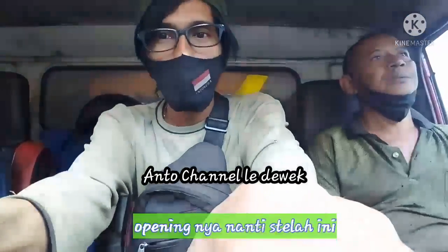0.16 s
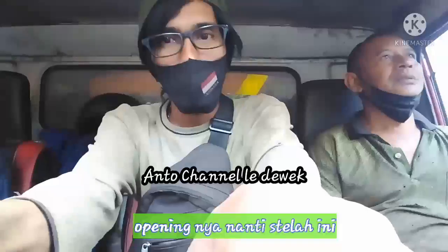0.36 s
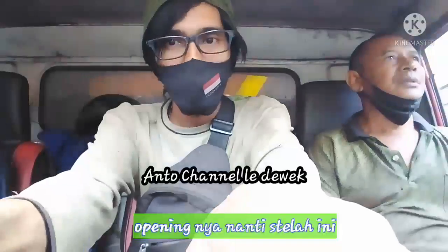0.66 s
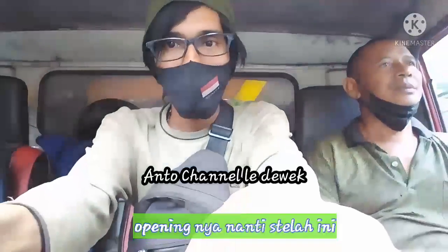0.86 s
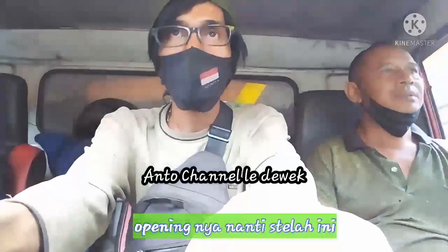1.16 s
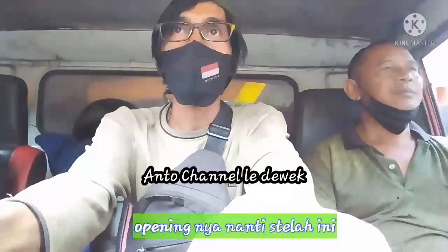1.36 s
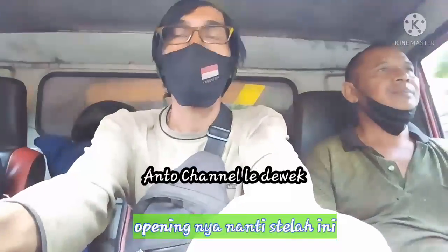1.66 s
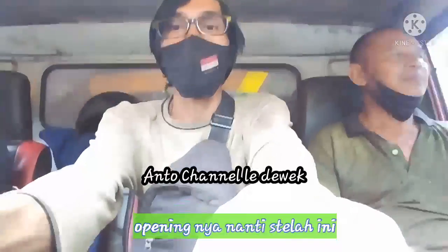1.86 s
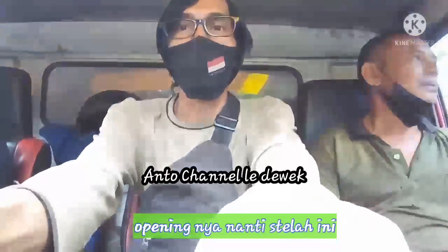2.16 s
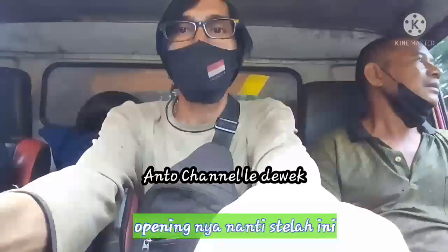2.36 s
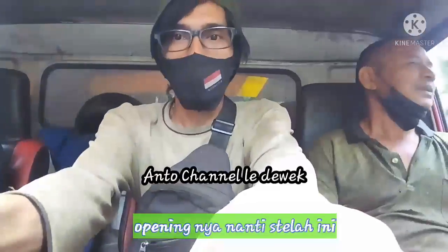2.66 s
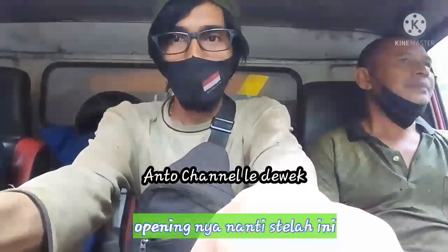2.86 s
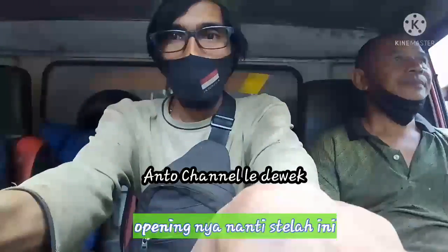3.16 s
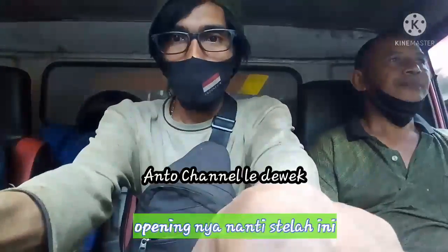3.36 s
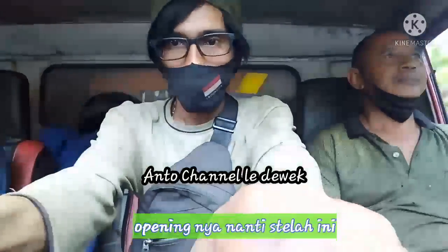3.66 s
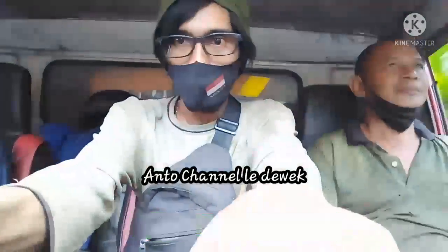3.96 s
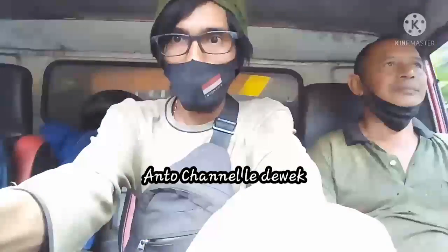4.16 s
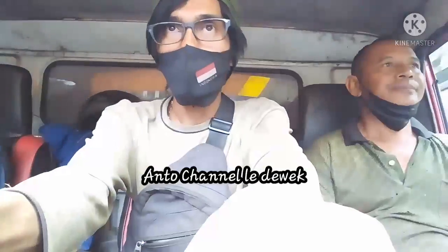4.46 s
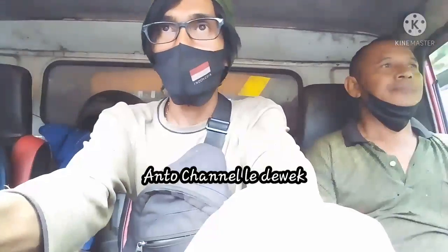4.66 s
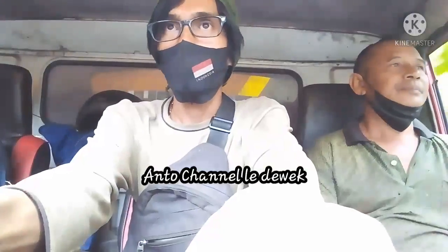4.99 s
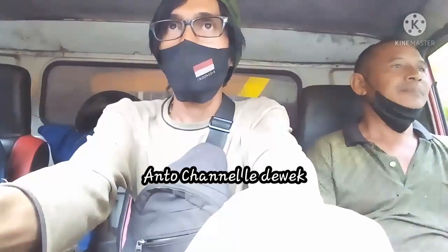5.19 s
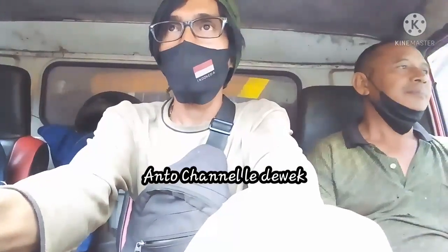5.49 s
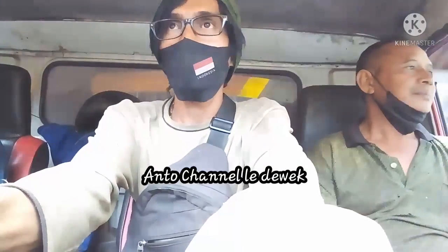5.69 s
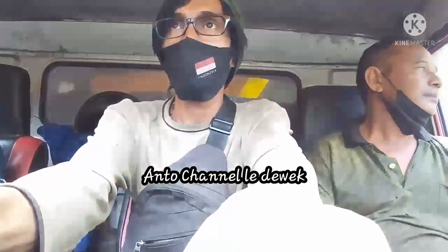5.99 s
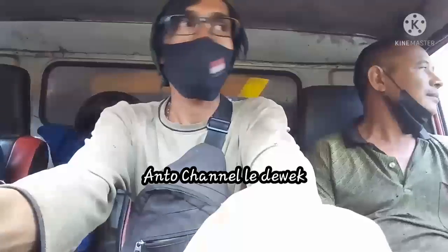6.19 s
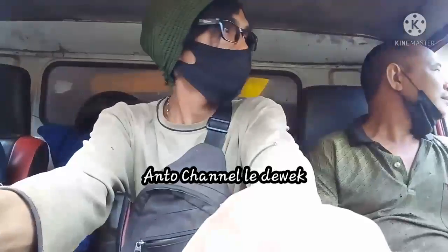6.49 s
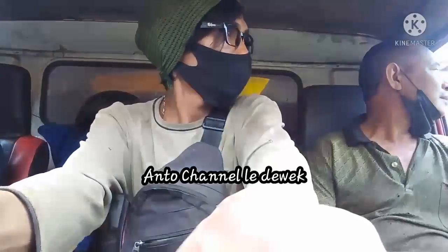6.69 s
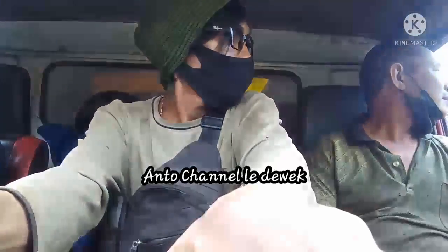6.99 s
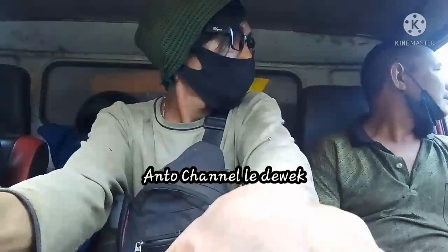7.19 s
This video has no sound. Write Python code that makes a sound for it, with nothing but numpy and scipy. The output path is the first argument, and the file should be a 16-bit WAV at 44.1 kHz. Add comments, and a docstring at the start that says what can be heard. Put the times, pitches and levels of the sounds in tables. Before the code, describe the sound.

A small four-cylinder diesel truck is heard inside its cramped cab through a hand-held phone. From 0 to 1 s a deep, pulsing boom near 50 Hz eases off, with soft cab rumble and thin hiss. Around 1.0-1.2 s a cluster of hard, near-overloading knocks and a dull rub cuts in; more knocks follow at 1.65-1.85, 2.0-2.3, 2.57 and 3.0-3.15 s, with brief grainy scuffs, and again at 3.6 and 4.0 s. Road jolts rumble softly, and clatter swells lightly near 2.5 s. The engine is quietest around 4.2-4.7 s while its pitch creeps up. At 5.0 s a very hard knock meets a loud grainy swish lasting about 0.2 s. From 5.3 s the engine pulls much louder, with growl, resonant panel drone and diesel clatter. A bright clatter swell with a tiny falling squeak comes near 6.2 s; the heavy drone then sags slightly in pitch until 7.3 s.

```python
"""An engine booms and eases off, then pulls again with a louder, clattering drone; knocks and rubs cut in.
It is a small four-cylinder diesel truck heard from inside its cab, on a hand-held phone.
Engine: tones locked to the firing rate, plus noise pulsed by each firing and coloured by block and cab.
Handling: pressure spikes with a case ring for knocks; swells of grainy noise for rubs and two clatter swells.
One loud swish, cab rumble and a thin hiss complete it."""
import sys
import numpy as np
from scipy import signal
from scipy.fft import rfft, irfft, next_fast_len
from scipy.io import wavfile
from scipy.ndimage import uniform_filter1d, minimum_filter1d

SR = 44100
rng = np.random.default_rng(int(sys.argv[2]) if len(sys.argv) > 2 else 0)


def materialize(psi):
    """Save the field psi as 16-bit PCM at rate SR to the path in sys.argv[1].

    A 1-D psi becomes a single channel; in a 2-D psi each row is a channel.
    """
    bounded = np.clip(np.atleast_2d(psi).T, -1, 1)
    quanta = np.round(bounded * 32767).astype(np.int16)
    wavfile.write(sys.argv[1], SR, quanta)


N = 323546
TIME_S = np.arange(N) / SR

# Engine speed. Each row: time in seconds, firings per second.
FIRING_RATE_HZ = [(0, 52.7), (.75, 51), (1.05, 49.7), (1.55, 49.4), (1.85, 50.9), (2.4, 48.1), (3.15, 50.3),
                  (3.6, 50), (4, 52.4), (4.8, 54.3), (5.35, 55.5), (5.85, 55.55), (6.1, 56.05),
                  (6.45, 55.7), (6.7, 55.8), (7.05, 53.3), (7.34, 52.6)]
# Cab boom at the firing rate. Each row: time in seconds, level in dB.
BOOM_DB = [(0.0, -15), (0.14, -13.5), (0.89, -21), (1.08, -16.5), (1.3, -26), (1.85, -24.5), (1.91, -36),
           (1.95, -23), (2.11, -23), (2.25, -29.5), (2.4, -18), (3.07, -27.5), (3.15, -28), (3.23, -22),
           (4.57, -37), (4.86, -24), (4.94, -26), (5.02, -13), (5.49, -23), (5.96, -16), (6.04, -19),
           (6.59, -11), (6.77, -14.5), (7.3, -14.5)]
# Engine easing off. Each row: time in seconds, low growl, panel drone and diesel clatter in dB.
EASING_DB = [(0.0, -24, -40, -56), (0.45, -27.5, -43.5, -56.5), (1.04, -26, -46, -57.5),
             (1.33, -32.5, -49.5, -59), (1.71, -35, -51, -61), (1.89, -31.5, -45, -58),
             (2.38, -29.5, -46.5, -52.5), (3.01, -34, -47.5, -55.5), (3.19, -28.5, -44, -55),
             (3.37, -30, -45, -54.5), (3.74, -39.5, -51.5, -59), (4.27, -41.5, -57.5, -62.5),
             (4.72, -40.5, -50.5, -57), (4.96, -25.5, -40, -43)]
# Engine pulling. Each row: time in seconds, low growl, panel drone and diesel clatter in dB.
PULLING_DB = [(5.3, -24.5, -29, -37.5), (5.42, -24, -36.5, -41), (5.46, -22.5, -28.5, -37),
              (6.05, -24.5, -31.5, -42.5), (6.1, -20, -28, -36.5), (6.78, -17, -25, -40.5),
              (7.14, -18.5, -28.5, -44.5), (7.32, -15.5, -26.5, -43)]
# Exhaust and block tones. Each row: multiple of the firing rate, dB coasting, dB pulling, re the growl.
GROWL_ORDERS = [(1.5, -8.5, -19.5), (2, -3.5, -1.5), (2.5, -13.5, -14.5), (3, -11, -7.5), (3.5, -17, -9.5),
                (4, -6.5, -11), (4.5, -30, -27), (5, -22.5, -10), (5.5, -30.5, -17)]
# Spectrum of the growl's noise. Each row: frequency in Hz, relative density in dB per Hz.
GROWL_SPECTRUM = [(22, -13.5), (45, -3.5), (75, -5), (130, 0.5), (190, -2.5), (260, -8.5), (340, -13),
                  (450, -23), (700, -55.5)]
# Spectrum of the clatter, coasting. Each row: frequency in Hz, relative density in dB per Hz.
COASTING_SPECTRUM = [(700, -16), (1100, 2), (1450, 2), (1700, -0.5), (2000, 1.5), (2750, -1.5),
                     (3050, -13.5), (4000, -16), (4400, -26), (5400, -20.5), (6500, -37), (15000, -51.5)]
# Spectrum of the clatter, pulling. Each row: frequency in Hz, relative density in dB per Hz.
PULLING_SPECTRUM = [(800, -3), (1300, 8.5), (1600, 5.5), (2100, -1.5), (2700, -4), (3300, -14), (4000, -19),
                    (5000, -29.5), (6500, -42.5), (10000, -37.5), (15000, -57)]
# Cab panel resonances. Each row: centre in Hz, width in Hz, relative strength in dB.
PANEL_MODES = [(405, 48, -7.5), (495.3, 20, 0), (543, 34, 0), (615, 36, -4.5), (773, 36, -4),
               (890, 41, -16.5), (970, 48, -12.5), (1130, 64, -14), (1326, 140, -16.5)]
# Knocks on the phone's case. Each row: time in seconds, signed peak pressure (+ pressing, - letting go),
# contact in ms.
KNOCKS = [ (0.9989, 0.22, 0.68), (1.1443, 1.4, 0.63), (1.1672, 0.36, 0.68), (1.1829, 0.5, 2.1),
          (1.196, -0.53, 4.1), (1.648, 0.2, 1.45), (1.6685, -0.33, 2.7), (1.6889, 0.63, 1.7),
          (1.7099, 0.51, 1.52), (1.7302, -.18, 1.6), (1.7778, 0.31, 1.08), (1.833, -0.56, 0.89),
          (2.0162, 0.15, 1.1), (2.0655, 0.82, .96), (2.1078, 0.55, 2.3), (2.1268, 0.26, 1.1),
          (2.2144, -0.64, .78), (2.3278, -0.41, 1.6), (2.4977, -.13, 1.5), (2.5691, -1.2, 1),
          (2.778, 0.13, 0.85), (2.9866, -0.96, 0.74), (3.0074, -0.71, 3.1), (3.0357, -0.57, 1.3),
          (3.103, -0.97, 0.77), (3.1488, 0.29, 1.5), (3.5974, 1.08, .6), (3.6647, 0.22, 1.3),
          (3.7363, -0.056, .67), (3.9492, -0.1, 0.56), (3.9681, -0.19, 1.7), (4.0053, -0.36, 0.88),
          (4.2135, -.1, 0.64), (4.4976, -.03, 0.48), (4.9865, -1.6, 1.08)]
# Fingers rubbing the case, and two longer, bright swells of engine clatter (2.476, 6.189).
# Each row: peak time in seconds, half length in seconds, scuff in dB, rasp in dB above the scuff.
RUBS_AND_CLATTER_SWELLS = [ (1.008, .005, -46, -3), (1.041, 0.045, -32.5, -13), (1.169, 0.0087, -13, -12.5),
                           (1.223, 0.0095, -20.5, -15.5), (1.245, 0.0086, -27.5, -11),
                           (1.957, 0.018, -33, -5.5), (2.023, .004, -24.5, -18), (2.105, .012, -30, -30.5),
                           (2.232, 0.0066, -31, -8), (2.331, .012, -27.5, -25), (2.476, .16, -56, 3),
                           (3.147, 0.023, -25, -29), (3.282, 0.042, -31, -3), (3.693, 0.016, -34.5, -2),
                           (4.034, 0.018, -26.5, -12.5), (4.048, 0.017, -45.5, 7), (6.189, 0.11, -36.5, -1)]
# Spectrum of the dull scuff part. Each row: frequency in Hz, relative density in dB per Hz.
SCUFF_SPECTRUM = [(40, -14), (110, 1), (300, -3), (480, -5.5), (750, -11), (1100, -22), (2000, -38),
                  (4000, -79.5)]
# Spectrum of the rasp part. Each row: frequency in Hz, relative density in dB per Hz.
RASP_SPECTRUM = [(250, -17.5), (550, 6.5), (950, 1.5), (1300, -1.5), (1650, -6.5), (2000, -10.5),
                 (2500, -19.5), (3200, -23.5), (3800, -34), (5000, -44.5), (9000, -72)]
# Spectrum of the hiss part and of skin snaps. Each row: frequency in Hz, relative density in dB per Hz.
HISS_SPECTRUM = [(1500, -11.5), (2700, 10.5), (4000, 8), (5200, 2), (6200, -9.5), (7300, -6.5),
                 (10000, -9.5), (15500, -14.5)]
# Skin snapping free. Each row: time in seconds, level in dB.
SNAPS = [(1.002, -54), (1.1443, -52), (1.99, -55), (2.24, -56), (4.062, -50), (5.18, -28.5)]
# Spectrum of the swish's body. Each row: frequency in Hz, relative density in dB per Hz.
SWISH_SPECTRUM = [(100, 4), (250, 3.5), (400, -5.5), (560, 0), (800, -3.5), (950, -6), (1300, -5),
                  (1800, -12), (2300, -17), (2900, -17.5), (3300, -26), (4000, -29.5), (4500, -44),
                  (6500, -48)]
# Spectrum of the swish's top hiss. Each row: frequency in Hz, relative density in dB per Hz.
SWISH_TOP_SPECTRUM = [(3000, 3), (5000, 13), (6200, -14), (7300, -1), (10000, -0.5), (13000, -10),
                      (15500, -12)]
# Bumps in the road. Each row: peak time in seconds, half length in seconds, level in dB.
JOLTS = [(0.248, 0.39, -28), (1.02, 0.19, -25.5), (1.683, 0.037, -27), (2.2, 0.33, -29.5), (2.61, .06, -20),
         (2.898, 0.097, -25.5), (6.6, 0.35, -41.5)]
# Spectrum of the cab rumble. Each row: frequency in Hz, relative density in dB per Hz.
RUMBLE_SPECTRUM = [(45, -22), (62, -5.5), (74, -4), (86, -9), (105, -15.5), (150, -29)]

# The throttle opens once; load rises from its coasting share to 1.
THROTTLE_S, THROTTLE_RISE_S, COASTING_LOAD = 4.7, 0.88, .13
CASE_HZ, CASE_T60_S = 107, 0.038
# Share of a 1 ms knock that swings the case (a pressing finger damps it); exponent on contact ms.
PRESS_RING, RELEASE_RING, RING_GROWTH = 0.54, 0.92, 0.15
# Hiss part: dB above the scuff when scuff and rasp are equal; dB per dB of rasp.
HISS_DB, HISS_DB_PER_DB = -26.5, 1.7
SNAP_DECAY_S = 0.0025
SQUEAK_S, SQUEAK_HALF_S, SQUEAK_DB, SQUEAK_HZ, SQUEAK_SAG_HZ_PER_S = 6.165, 0.016, -31.5, 1620, 800
SWISH_S, SWISH_ATTACK_S, SWISH_END_S = 4.988, .115, 5.185
SWISH_DB, SWISH_DECAY_S, SWISH_TOP_DB, SWISH_TOP_DECAY_S = -15.5, 0.037, -52, 0.02
ROAD_DB = -42
# Thin hiss: level at a clatter of 0 dB; share of the clatter's dB swing.
AIR_DB, AIR_DB_PER_DB = -68, 0.25
CUTOFF_HZ = 15600


def engine(growl_noise_db=-2.0, growl_coasting_db=-0.5, growl_pulling_db=-1.5):
    """Firings drive the cab's air, its panels and the clatter of the block."""
    (rate_hz,), (boom_db,) = in_time(FIRING_RATE_HZ), in_time(BOOM_DB)
    growl_db, drone_db, clatter_db = in_time(EASING_DB + PULLING_DB)
    load = np.clip(COASTING_LOAD + (1 - COASTING_LOAD) * ramp(THROTTLE_S, THROTTLE_RISE_S), 0, 1)
    growl_db = growl_db + growl_coasting_db + (growl_pulling_db - growl_coasting_db) * load
    turn = np.cumsum(rate_hz) / SR  # firings so far

    boom = np.sqrt(2) * from_db(boom_db + 0.63 * drift(13.0)) * np.cos(2 * np.pi * turn)
    growl = tones(turn, GROWL_ORDERS, load, rough=.2)
    growl_noise = firing_noise(turn, GROWL_SPECTRUM, sharpness=0.12, uneven_db=2.0, repeat=0.04)
    growl += from_db(growl_noise_db) * growl_noise
    coasting = firing_noise(turn, COASTING_SPECTRUM, sharpness=0.048, uneven_db=0.5, repeat=0.42)
    pulling = firing_noise(turn, PULLING_SPECTRUM, sharpness=0.059, uneven_db=0.8, repeat=0.14)
    clatter = (1 - load) * coasting + load * pulling
    drone = panel_drone(turn, rate_hz)
    return boom + from_db(growl_db) * growl + from_db(drone_db) * drone + from_db(clatter_db) * clatter


def tones(turn, orders, load, rough):
    """Multiples of the firing rate, each wavering in strength and phase."""
    out = np.zeros(N)
    for multiple, coasting_db, pulling_db in orders:
        start_turns = rng.random() * (multiple > 2)  # low orders start in phase
        angle = 2 * np.pi * (np.round(2 * multiple) / 2 * turn + start_turns)
        level_db = coasting_db + (pulling_db - coasting_db) * load
        out += np.sqrt(2) * from_db(level_db) * wavering(angle, rough)
    return out


def wavering(angle, rough):
    """Slow random in-phase and quadrature parts make a tone waver."""
    return (1 + rough * drift(3)) * np.cos(angle) + rough * drift(3) * np.sin(angle)


def firing_noise(turn, spectrum, sharpness, uneven_db, repeat):
    """A puff at each firing, of random strength; a share repeats with every four-cylinder cycle."""
    firing = np.floor(turn + .5).astype(int)
    strength = from_db(uneven_db * rng.standard_normal(1000))[firing]
    pattern = rng.standard_normal(2400)
    cycle = rms_one(np.interp(turn % 4 / 4, np.linspace(0, 1, len(pattern)), pattern))
    repeat = np.clip(repeat, 0, 1)
    drive = np.sqrt(repeat) * cycle + np.sqrt(1 - repeat) * rng.standard_normal(N)
    puff = np.exp(sharpness * np.cos(2 * np.pi * turn))
    return coloured(drive * strength * puff, spectrum)


def panel_drone(turn, rate_hz, tone_db=-3, half_order_db=-9, noise_db=-2.0, rough=0.32):
    """Each engine order swells as it crosses a panel resonance; combustion noise rings the same panels."""
    lines = np.zeros(N)
    for halves in range(13, 34):  # orders 6.5 to 16.5 of the firing rate
        angle = np.pi * halves * turn + 2 * np.pi * rng.random()
        gain = np.interp(TIME_S, TIME_S[::256], panel_gain(halves / 2 * rate_hz[::256]))
        lines += from_db(half_order_db * (halves % 2)) * gain * wavering(angle, rough)
    hz = np.geomspace(150, 3000, 400)
    spectrum = np.c_[hz, 20 * np.log10(panel_gain(hz))]
    noise = firing_noise(turn, spectrum, sharpness=0.076, uneven_db=1.0, repeat=0)
    return from_db(tone_db) * rms_one(lines) + from_db(noise_db) * noise


def panel_gain(hz):
    """Panel response: resonances summed in power, dark below and above them."""
    power = 0
    for centre_hz, width_hz, db in PANEL_MODES:
        detuning = (hz / centre_hz - centre_hz / hz) * centre_hz / width_hz
        power = power + from_db(2 * db) / (1 + detuning ** 2)
    return np.sqrt(power / (1 + (hz / 1600) ** 8) / (1 + (300 / hz) ** 6))


def knocks(rebound_ms=1.3, lag_ms=0.68, rebound_share=.22, crack_share=0.064, crack_ms=.25):
    """A contact is a pressure spike with a tiny crack at its tip; the case swings back and dies away."""
    out = np.zeros(N)
    for s, peak, contact_ms in KNOCKS:
        near = slice(int((s - .01) * SR), int((s + .07) * SR))
        t_s = TIME_S[near] - s
        ms = t_s * 1000
        ring_share = (PRESS_RING if peak > 0 else RELEASE_RING) * contact_ms ** RING_GROWTH
        spike = 1 / np.cosh(np.clip(2 * ms / contact_ms, -30, 30)) ** 2
        crack = crack_share * abs(peak) * np.exp(-(ms / crack_ms) ** 2)  # harder knocks crack more
        rebound = np.exp(-((ms - lag_ms - contact_ms / 2) / rebound_ms) ** 2)
        settled = (1 + np.tanh((ms - contact_ms) / (1.2 * contact_ms))) / 2
        decay = from_db(-60 * np.maximum(t_s, 0) / CASE_T60_S)
        swing = settled * decay * np.cos(2 * np.pi * CASE_HZ * t_s - 1.7)
        out[near] += peak * (spike + crack - rebound_share * rebound - ring_share * swing)
    return out


def rubs_and_clatter_swells(grain_db=2.5):
    """Stick-slip rubs and two bright clatter swells: grainy scuff, rasp, and hiss that grows with the rasp."""
    grain = from_db(grain_db * drift(120))
    pressures = np.zeros((3, N))
    for s, half_length_s, scuff_db, rasp_db in RUBS_AND_CLATTER_SWELLS:
        levels_db = scuff_db + np.array([0, rasp_db, HISS_DB + HISS_DB_PER_DB * rasp_db])
        pressures += np.outer(from_db(levels_db), swell(s, half_length_s))
    out = np.zeros(N)
    for pressure, spectrum in zip(pressures, (SCUFF_SPECTRUM, RASP_SPECTRUM, HISS_SPECTRUM)):
        out += pressure * coloured(grain * rng.standard_normal(N), spectrum)
    return out


def snaps():
    """Skin letting go gives a tiny bright burst: sudden onset, exponential decay."""
    bursts = np.zeros(N)
    for s, db in SNAPS:
        decay = np.exp(-np.minimum(np.abs(TIME_S - s) / SNAP_DECAY_S, 20))
        bursts += from_db(db) * (TIME_S >= s) * decay
    return bursts * coloured(rng.standard_normal(N), HISS_SPECTRUM)


def squeak():
    """For a moment a fingertip's slips fall into step and give a thin falling tone."""
    hz = SQUEAK_HZ - SQUEAK_SAG_HZ_PER_S * (TIME_S - SQUEAK_S)
    angle = 2 * np.pi * np.cumsum(hz * (1 + 0.009 * drift(90))) / SR
    return from_db(SQUEAK_DB) * swell(SQUEAK_S, SQUEAK_HALF_S) * np.sin(angle)


def swish(grain_db=1.5):
    """A grainy rush across the microphone swells, holds and dies away, its top hiss faster than its body."""
    since_end_s = np.maximum(TIME_S - SWISH_END_S, 0)
    grain = ramp(SWISH_S, SWISH_ATTACK_S) * from_db(grain_db * drift(150))
    body = np.exp(-since_end_s / SWISH_DECAY_S) * coloured(rng.standard_normal(N), SWISH_SPECTRUM)
    top = np.exp(-since_end_s / SWISH_TOP_DECAY_S) * coloured(rng.standard_normal(N), SWISH_TOP_SPECTRUM)
    return grain * (from_db(SWISH_DB) * body + from_db(SWISH_TOP_DB) * top)


def rumble():
    """The sprung cab shakes at its lowest resonance: a little all the time, more over each bump."""
    shaking = np.full(N, from_db(ROAD_DB))
    for s, half_length_s, db in JOLTS:
        shaking += from_db(db) * swell(s, half_length_s)
    return shaking * coloured(rng.standard_normal(N), RUMBLE_SPECTRUM)


def air():
    """A thin white hiss that rises and falls with the engine's clatter."""
    *_, clatter_db = in_time(EASING_DB + PULLING_DB)
    return from_db(AIR_DB + AIR_DB_PER_DB * clatter_db) * rng.standard_normal(N)


def coloured(drive, spectrum):
    """Pass an excitation through a body with the given spectrum; rms 1."""
    size = next_fast_len(N + 4096)
    hz, level_db = np.transpose(spectrum)
    bins_hz = np.maximum(np.fft.rfftfreq(size, 1 / SR), 1)
    shape = from_db(np.interp(np.log(bins_hz), np.log(hz), level_db))
    # 12 dB per octave beyond either end
    skirts = np.minimum(bins_hz / hz[0], 1) ** 2 * np.minimum(hz[-1] / bins_hz, 1) ** 2
    return rms_one(irfft(rfft(drive, size) * shape * skirts, size)[:N])


def drift(rate_hz):
    """Random wander of spread 1, weakening above rate_hz."""
    size, slow_sr = 4096 * 2, 800
    hz = np.fft.rfftfreq(size, 1 / slow_sr)
    slow = irfft(rfft(rng.standard_normal(size)) / (1 + (hz / rate_hz) ** 2))
    return np.interp(TIME_S * slow_sr, np.arange(len(slow)), rms_one(slow))


def swell(peak_s, half_length_s):
    """A smooth Gaussian rise and fall of height 1."""
    return np.exp(-.5 * np.minimum(((TIME_S - peak_s) / half_length_s) ** 2, 100))


def ramp(start_s, length_s):
    """A straight rise from 0 to 1."""
    return np.clip((TIME_S - start_s) / length_s, 0, 1)


def in_time(rows):
    """Each column of a curve at every sample."""
    s, *columns = np.transpose(rows)
    return [np.interp(TIME_S, s, column) for column in columns]


def rms_one(x):
    """Scale to an rms of 1."""
    return x / np.sqrt(np.mean(x ** 2) + 1e-20)


def from_db(db):
    """Decibels to gain."""
    return 10 ** (np.asarray(db) / 20)


def scene():
    """Engine, handling noise, clatter swells, swish, cab rumble and a thin hiss at one microphone."""
    close = knocks() + rubs_and_clatter_swells() + snaps() + squeak()
    return (engine() + close + swish() + rumble() + air())[None, :]


def record(dry):
    """A fast limiter holds the hardest knocks at full scale; then the top is cut."""
    needed = 1 / np.maximum(np.abs(dry), 1)
    gain = uniform_filter1d(minimum_filter1d(needed, size=129), size=129)
    top_cut = signal.cheby2(14, 60, CUTOFF_HZ + 1000, fs=SR, output="sos")
    return signal.sosfilt(top_cut, dry * gain)


dry = scene()
out = record(dry)
materialize(out)
```